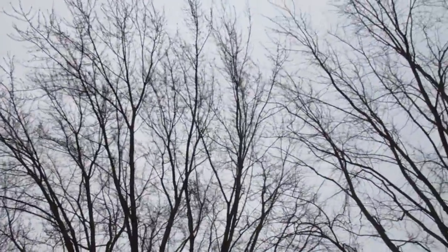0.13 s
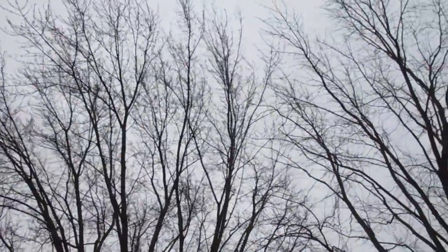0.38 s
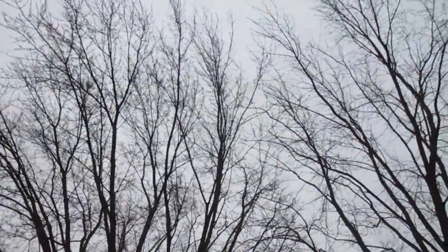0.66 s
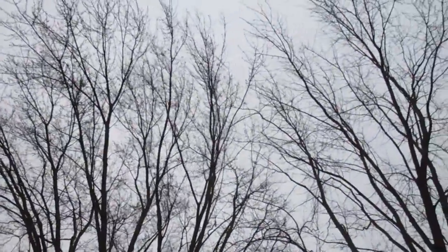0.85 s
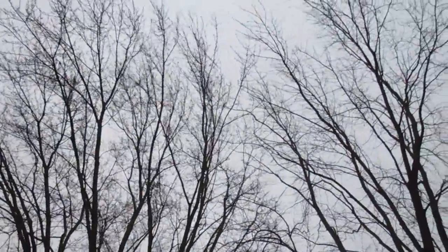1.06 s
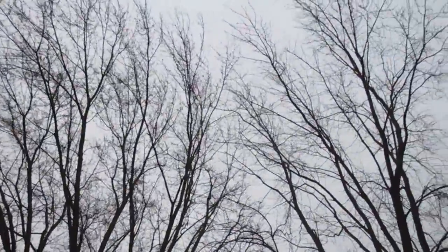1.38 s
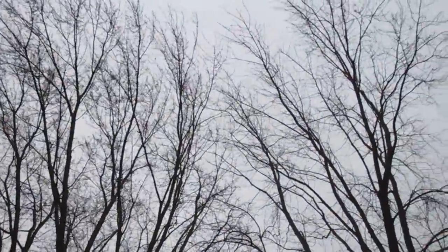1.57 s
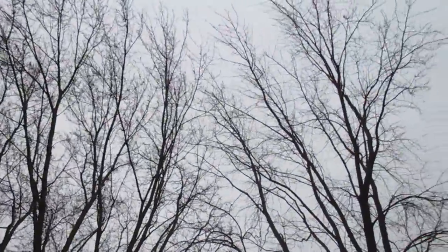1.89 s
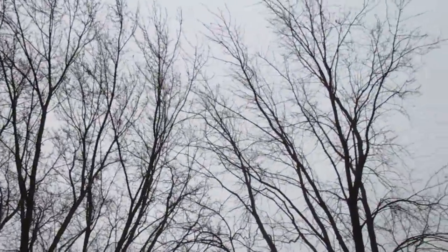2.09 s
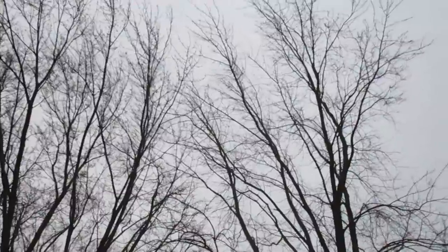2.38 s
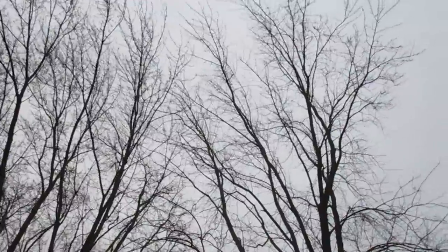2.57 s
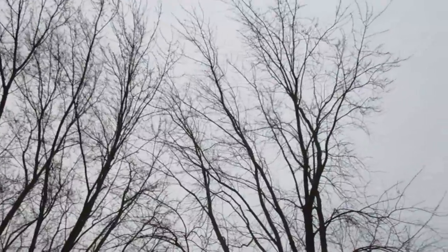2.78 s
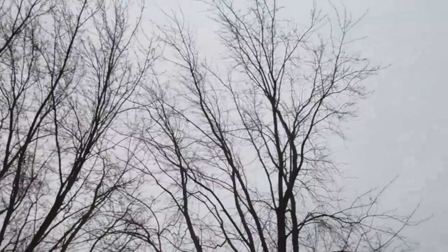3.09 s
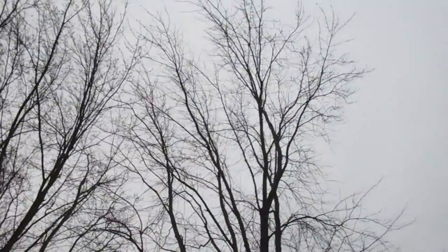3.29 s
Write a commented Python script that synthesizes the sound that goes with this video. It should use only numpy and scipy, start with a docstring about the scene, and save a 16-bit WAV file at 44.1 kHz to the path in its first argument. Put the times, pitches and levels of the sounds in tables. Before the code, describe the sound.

Strong wind roars through tall bare trees, building, then holding steady while buffeting the microphone.

```python
"""A gust builds in tall bare trees and then holds: a deep roar, a smooth hiss, ticks and low buffeting.
Limbs, branches and finest twigs are three bands of shaped noise; twigs that touch tick as short noise puffs.
The gust buffets the microphone of a small camera: lumpy low noise plus single eddies as sine thumps.
The housing cuts three notches (the highest a narrow dip in a wide one) into all it hears."""
import sys
import numpy as np
from scipy import signal
from scipy.fft import rfft, irfft, next_fast_len
from scipy.io import wavfile
from scipy.ndimage import uniform_filter1d, map_coordinates

SR = 44100
rng = np.random.default_rng(int(sys.argv[2]) if len(sys.argv) > 2 else 0)


def unload_audio(sound):
    """Save the sound as a 16-bit wav file, at the path given as the first command line argument."""
    columns = np.transpose(np.atleast_2d(sound))
    # keep every value between -1 and 1, then stretch to whole-number steps
    steps = np.round(np.clip(columns, -1, 1) * 32767)
    wavfile.write(sys.argv[1], SR, steps.astype(np.int16))


N = 152145

# Wind in the trees. Each row: time in seconds, levels in dB of the limbs, the branches and the finest twigs.
TREE_LEVELS = [(0, -32, -48, -57.5), (.25, -32.5, -46, -56.5), (.55, -30.5, -44.5, -54),
               (.85, -27.5, -42.5, -53), (1.1, -28, -41, -51), (1.3, -24.5, -39.5, -50.5),
               (1.6, -26, -38, -48), (1.9, -24.5, -37.5, -48), (2.15, -23, -37.5, -46.5),
               (2.35, -24, -37, -45), (2.5, -23.5, -37.5, -45.5), (2.6, -23.5, -36.5, -45.5),
               (3.05, -22, -37.5, -46), (3.45, -23, -37.5, -46.5)]
# Noise spectra of limbs, branches, finest twigs and buffeting; only the shape counts.
# Each row: frequency in Hz, relative density in dB per Hz.
LIMB_SPECTRUM = [(15, -51), (30, -31), (80, -8.5), (140, -1.5), (270, -1), (400, -8.5), (500, -12.5),
                 (640, -19.5), (800, -28), (1500, -31)]
BRANCH_SPECTRUM = [(300, -41), (700, -7), (1400, -2), (2400, -5.5), (3300, -13.5), (4200, -18.5),
                   (9000, -55)]
TWIG_SPECTRUM = [(1500, -50), (2500, -5.5), (3700, 5.5), (6000, 2.5), (8500, -1.5), (11300, -7),
                 (13500, -14.5), (15800, -23)]
BUFFET_SPECTRUM = [(15, -36), (30, 0), (48, -3.5), (110, -1), (170, -8.5), (300, -21.5), (600, -26.5)]
# Turbulence at the microphone. Each row: time in seconds, level of the lumpy noise in dB.
BUFFET_LEVEL = [(0, -37.5), (.5, -39), (1.0, -35.5), (1.3, -31.5), (1.45, -30), (1.9, -32), (2.0, -25),
                (2.13, -27), (2.22, -21), (2.4, -23), (2.55, -26), (2.75, -26), (3.15, -34.5), (3.3, -22),
                (3.45, -43)]
# Single eddies on the port. Each row: time of the middle in seconds, peak in dB, pitch in Hz.
EDDIES = [(1.541, -23, 55), (1.61, -13, 220), (1.665, -15.5, 200), (1.89, -15.5, 230), (2.015, -17, 83.6),
          (2.05, -20, 55), (2.185, -16.5, 105), (2.22, -16, 120), (2.247, -12.5, 142), (2.285, -11, 91.5),
          (2.309, -18, 64.4), (2.369, -14.5, 62), (2.41, -19, 60), (2.465, -10.5, 106), (2.482, -12, 95),
          (2.537, -8.5, 226), (2.663, -16, 198), (3.25, -16.5, 72)]
# Twigs touching. Each row: start in seconds, level in dB, pitch in Hz, width in octaves, t60 in seconds.
TWIG_TICKS = [(.052, -51, 9500, .2, .015), (.064, -47, 7000, .2, .015), (.164, -60, 13000, .2, .02),
              (.4565, -34, 3700, .17, .011), (.567, -52, 9500, .2, .03), (.919, -56, 11500, .2, .02),
              (1.06, -55, 12500, .2, .015), (1.064, -43, 5000, .5, .015), (2.302, -48, 10300, .08, .015),
              (2.32, -47, 10300, .1, .015), (2.339, -34, 3900, .2, .07), (2.343, -40, 8500, .25, .03),
              (2.346, -40, 5800, .12, .02), (2.346, -50, 13700, .06, .015), (2.388, -42, 4000, .4, .04),
              (2.92, -49, 6000, .6, .02), (3.395, -50, 13500, .15, .015)]
# Notches of the housing. Each row: centre in Hz, width in Hz, gain at the centre in dB.
HOUSING_NOTCHES = [(798, 253, -5.5), (3020, 330, -3.5), (4830, 1270, -10), (4790, 560, -7.5)]

TICK_RISE_S, TICK_SAMPLES = 0.0008, 4096
BUFFET_LUMPS_DB, THUMP_CYCLES = 2, 0.79
SELF_NOISE_DB, TOP_HZ = -73, 15750


def amp(db):
    """Amplitude ratio of a level in dB."""
    return 10 ** (np.asarray(db) / 20)


def unit(x):
    """x scaled to rms 1."""
    return x / np.sqrt(np.mean(x ** 2) + 1e-20)


def curves(rows):
    """One value per sample for each column after the time."""
    time_s, *columns = np.transpose(rows)
    return [np.interp(np.arange(N) / SR, time_s, column) for column in columns]


def wobble(knots_per_s):
    """Smooth random curve through normal random knots."""
    return map_coordinates(rng.standard_normal(200), [np.arange(N) * knots_per_s / SR])


def filtered(x, response):
    """x through a complex response of frequency in Hz."""
    size = next_fast_len(N + SR // 2)
    spectrum = rfft(x, size) * response(np.fft.rfftfreq(size, 1 / SR))
    return irfft(spectrum, size)[..., :N]


def rush(spectrum, patchy_db):
    """Shaped noise of rms 1; its gain varies in random patches of time and frequency, rms patchy_db."""
    cells = signal.stft(rng.standard_normal(N + 512), nperseg=512)[2]
    patches = uniform_filter1d(rng.standard_normal(cells.shape), size=6, axis=0)
    patches = uniform_filter1d(patches, size=14, axis=1)
    noise = signal.istft(cells * amp(patchy_db * unit(patches)), nperseg=512)[1][:N]
    knot_hz, knot_db = np.transpose(spectrum)

    def shape(hz):
        return amp(np.interp(np.log(hz + 1), np.log(knot_hz + 1), knot_db, -120, -120))

    return unit(filtered(noise, shape))


def buffet(level_db):
    """Turbulence on the microphone port: lumpy low noise, and strong eddies as short low thumps."""
    lumpy = amp(BUFFET_LUMPS_DB * wobble(14)) * rush(BUFFET_SPECTRUM, patchy_db=0.95)
    lumps = amp(level_db) * unit(lumpy)

    middle_s, peak_db, pitch_hz = np.transpose(EDDIES)[:, :, None]
    cycles = (np.arange(N) / SR - middle_s) * pitch_hz
    swell = amp(peak_db) * np.exp(-(cycles / THUMP_CYCLES) ** 2)
    start_cycles = rng.random((len(middle_s), 1))
    thumps = swell * np.sin(2 * np.pi * (cycles + start_cycles))
    return lumps + np.sum(thumps, axis=0)


def twigs():
    """Twigs touch: each tick is a short puff of noise around its own pitch."""
    start_s, level_db, pitch_hz, width_octaves, t60_s = np.transpose(TWIG_TICKS)[:, :, None]
    t = np.arange(TICK_SAMPLES) / SR
    hz = np.fft.rfftfreq(TICK_SAMPLES, 1 / SR) + 1  # + 1 keeps the log finite
    fade = amp(-60 * t / t60_s) * (1 - np.exp(-t / TICK_RISE_S))
    band = np.exp(-0.5 * (np.log2(hz / pitch_hz) / width_octaves) ** 2)
    noise = rng.standard_normal((len(start_s), TICK_SAMPLES))
    puff = fade * irfft(rfft(noise) * band)
    # puffs get the spread of their fade, so a narrow band is no quieter
    puff = amp(level_db) * puff * fade.std(axis=1, keepdims=True) / puff.std(axis=1, keepdims=True)
    where = (start_s * SR).astype(int) + np.arange(TICK_SAMPLES)
    return np.bincount(where.ravel(), puff.ravel(), N + TICK_SAMPLES)[:N]


def trees(limb_db, branch_db, twig_db):
    """Wind noise by size of wood: limbs roar, branches rush, the finest twigs hiss on top and flutter."""
    flutter_db = 0.5 * wobble(25.55) + 0.29 * wobble(13.0)  # shared by branches and twigs
    roar = amp(limb_db + 0.43 * wobble(17)) * rush(LIMB_SPECTRUM, patchy_db=0.27)
    hiss = amp(branch_db + 0.12 * flutter_db) * rush(BRANCH_SPECTRUM, patchy_db=0.28)
    fizz = amp(twig_db + flutter_db) * rush(TWIG_SPECTRUM, patchy_db=0.0)
    return roar + hiss + fizz


def scene():
    """Buffeting, ticks and trees summed to one channel."""
    mix = buffet(*curves(BUFFET_LEVEL)) + twigs() + trees(*curves(TREE_LEVELS))
    return mix[None]


def record(dry):
    """Notches of the microphone housing, the recorder's hiss, then the band limit."""
    def housing(hz):
        response = 1
        for centre_hz, width_hz, gain_db in HOUSING_NOTCHES:
            detuning = centre_hz ** 2 - hz ** 2
            damping = 1j * hz * width_hz
            response = response * (detuning + damping * amp(gain_db)) / (detuning + damping)
        return response

    heard = filtered(dry, housing) + amp(SELF_NOISE_DB) * rng.standard_normal(dry.shape)
    return filtered(heard, lambda hz: hz < TOP_HZ)


dry = scene()
out = record(dry)
unload_audio(out)
```